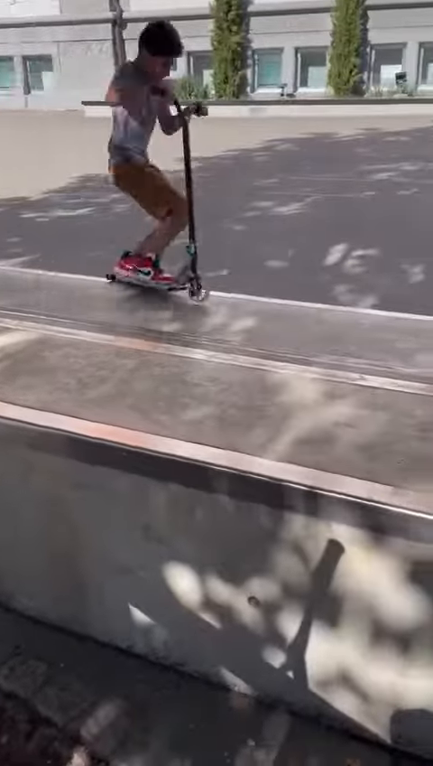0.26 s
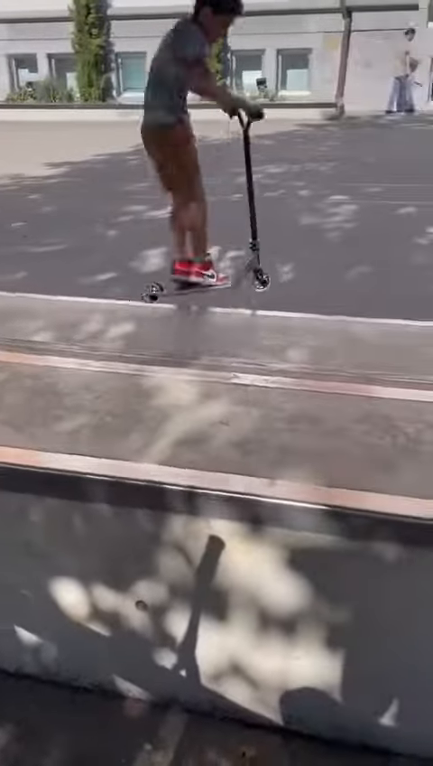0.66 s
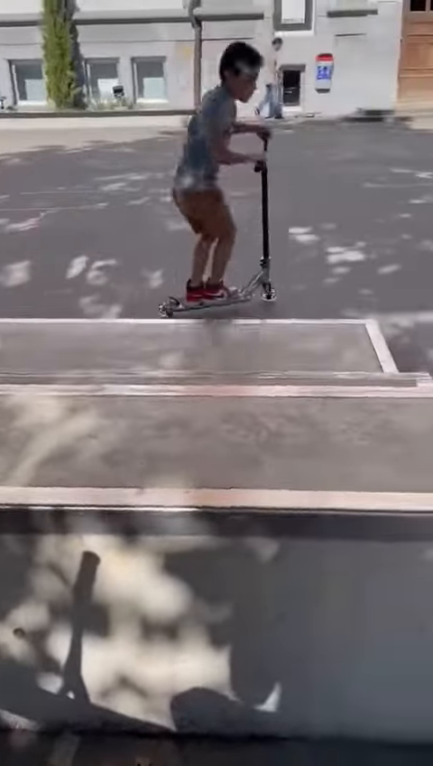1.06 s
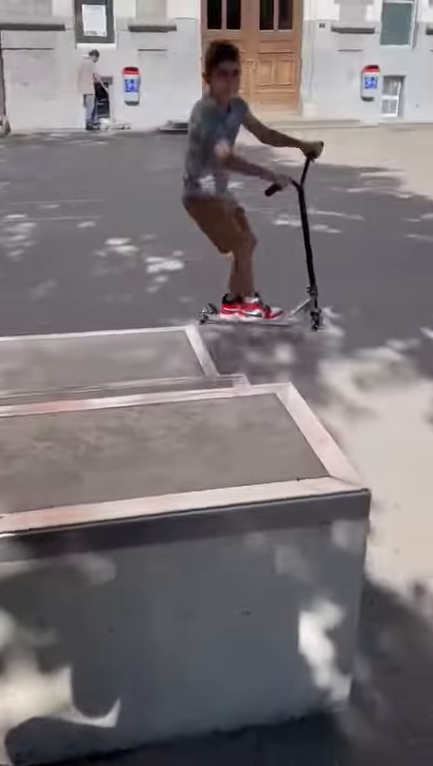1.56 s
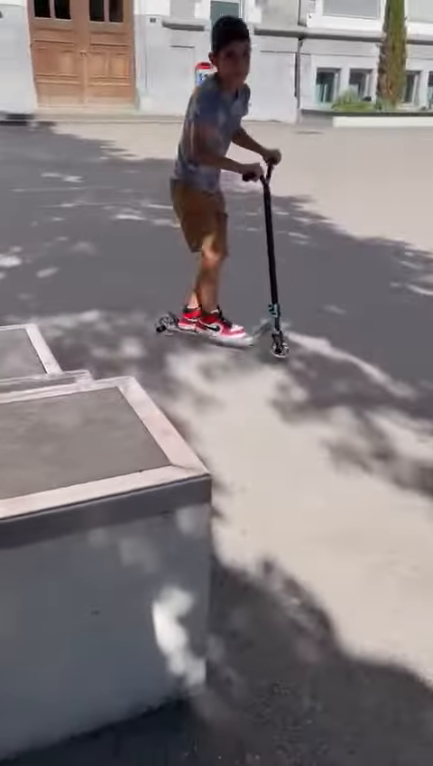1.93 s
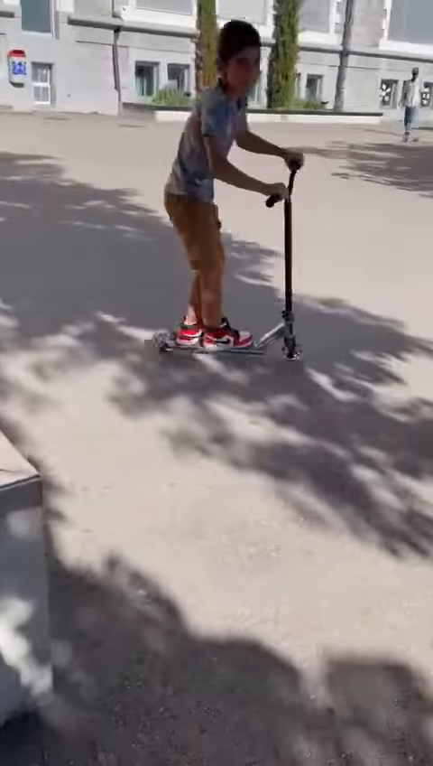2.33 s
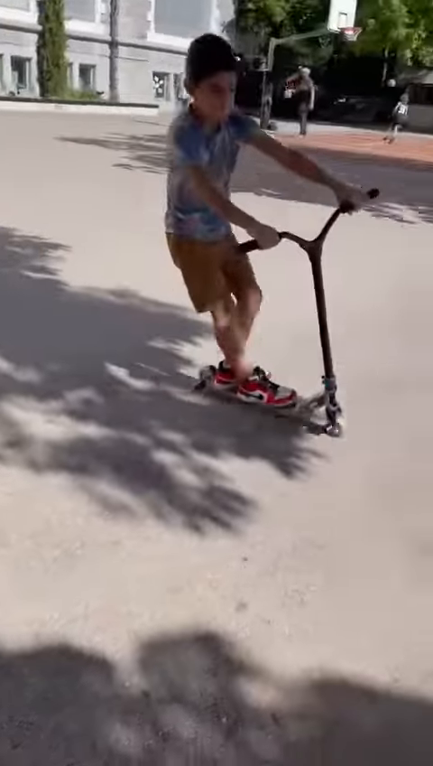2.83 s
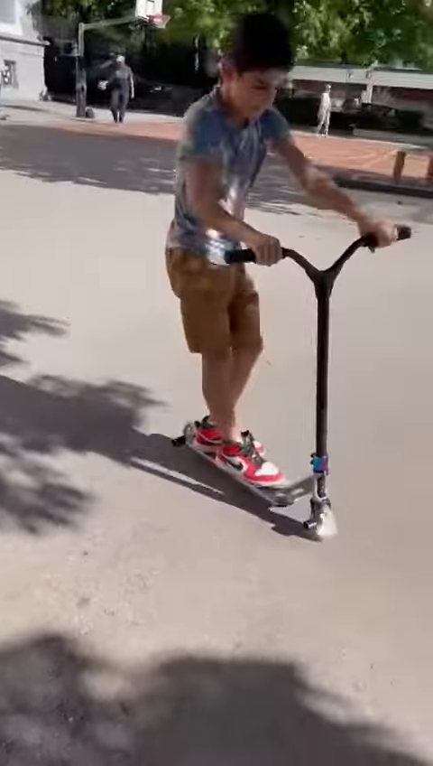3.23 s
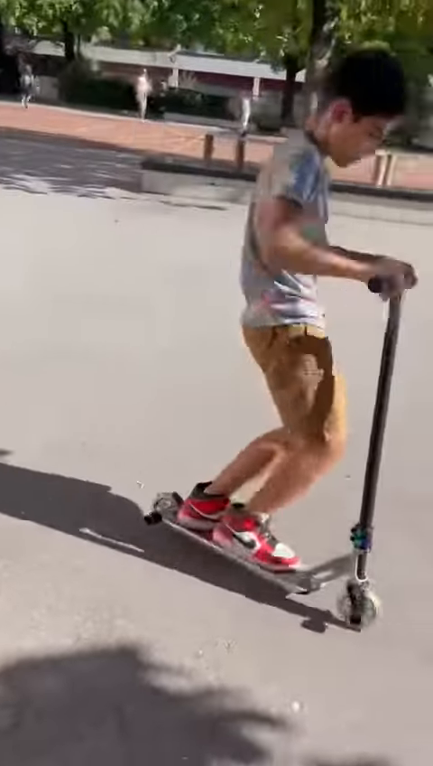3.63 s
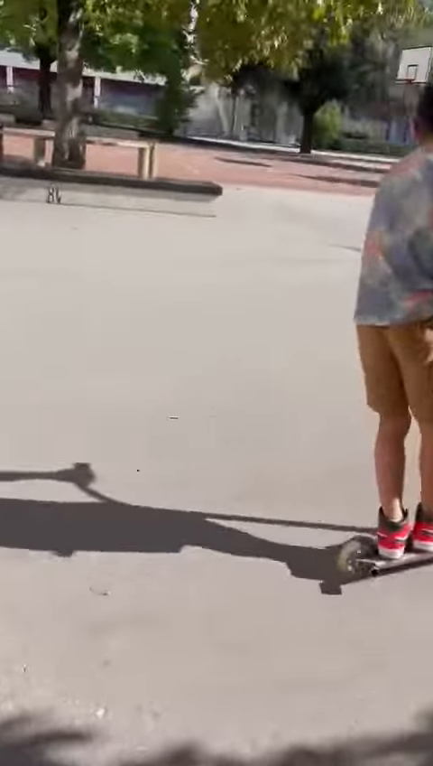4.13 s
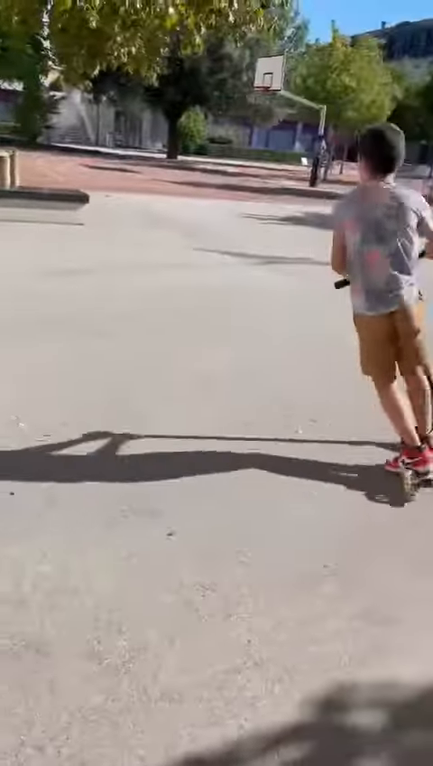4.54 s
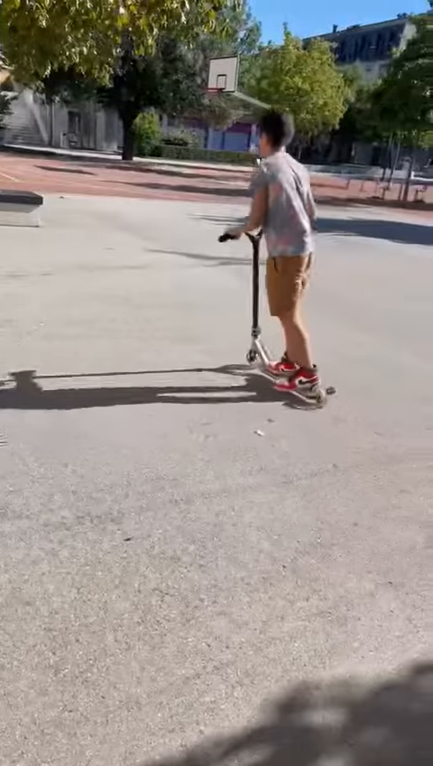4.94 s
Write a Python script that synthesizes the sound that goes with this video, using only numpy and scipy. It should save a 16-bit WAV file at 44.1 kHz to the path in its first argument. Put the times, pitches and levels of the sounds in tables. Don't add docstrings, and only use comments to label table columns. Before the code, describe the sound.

A ball thump and bright scooter clack start together, quickly followed by steel scraping, a high rubber squeak and deck knocks. Wheels drone and crunch softly across the ground between impacts, building to a hard clattering landing, then lighter scuffs and ticks. Farther off, hollow ball thumps repeat with short wall echoes. Soft town rumble fills the open yard; the moving phone microphone makes the sides shift.

```python
import sys
import numpy as np
from scipy import signal
from scipy.fft import rfft, irfft, next_fast_len
from scipy.io import wavfile
from scipy.ndimage import uniform_filter1d, map_coordinates

SR = 44100
rng = np.random.default_rng(int(sys.argv[2]) if len(sys.argv) > 2 else 0)


def transcribe(signal):
    frames = np.atleast_2d(signal).T
    limited = np.clip(frames, -1, 1)
    pcm = np.round(limited * 32767).astype(np.int16)
    wavfile.write(sys.argv[1], SR, pcm)


def volts_from_db(level):
    exponent = np.asarray(level, float) / 20
    return 10 ** exponent


N = 229128


def unit(x):
    return x / np.sqrt(np.mean(x ** 2) + 1e-20)


def along(points, hz):
    f, v = np.transpose(points)
    return np.interp(np.log(hz + 1), np.log(f + 1), v)


def curves(rows):
    s, *cols = np.transpose(rows)
    return [np.interp(np.arange(N) / SR, s, c) for c in cols]


def wobble(rate):
    knots = rng.standard_normal(int(N * rate / SR) + 4)
    return map_coordinates(knots, [np.arange(N) * rate / SR])


def filtered(x, response):
    m = next_fast_len(x.shape[-1] + 4096)
    return irfft(rfft(x, m) * response(np.fft.rfftfreq(m, 1 / SR)), m)[..., :x.shape[-1]]


def shaped(x, spectrum):
    return filtered(x, lambda hz: volts_from_db(along(spectrum, hz)))


def resonant(modes):
    def response(f):
        total = 0
        for k, (c, w, db) in enumerate(modes):
            total = total + (-1) ** k * volts_from_db(db) * 1j * f * w / (c * c - f * f + 1j * f * w)
        return total
    return response


def gritty(length, grain_db):
    grains = np.minimum(rng.exponential(size=length // 40 + 1), 3)
    size = volts_from_db(grain_db * grains).repeat(40)[:length]
    return unit(size * rng.standard_normal((2, length)))


def patchy(x, depth_db):
    z = signal.stft(x, nperseg=2048)[2]
    field = uniform_filter1d(rng.standard_normal(z.shape[1:]), size=3, axis=0)
    field = uniform_filter1d(field, size=4, axis=1)
    return unit(signal.istft(z * volts_from_db(depth_db * unit(field)), nperseg=2048)[1][:, :N])


def add(track, s, x):
    x = x[..., max(0, -round(s * SR)):]
    at = int(np.clip(round(s * SR), 0, N))
    track[..., at:at + x.shape[-1]] += x[..., :track.shape[-1] - at]


# time in seconds, rumble level in dB.
TOWN_SWELLS = [(0.0, -52.5), (0.72, -40), (1.11, -50.5), (2.07, -43), (2.25, -48.5), (3.7, -45.5),
               (4.05, -40), (4.55, -47), (5.19, -42)]
# time in seconds, rolling level in dB.
ROLLING = [(0.0, -48), (0.42, -43.5), (0.55, -51), (1.07, -55), (1.42, -53.5), (1.78, -52), (1.91, -46),
           (2.23, -52.5), (2.56, -52.5), (2.72, -46), (2.99, -51), (3.32, -53), (3.64, -53.5), (3.79, -43),
           (3.84, -45), (4.15, -48.5), (5.03, -48.5), (5.19, -46)]
# frequency in Hz, density in dB per Hz.
RUMBLE_COLOUR = [(20, -61), (40, -3.5), (60, 2), (150, 1), (230, -5.5), (350, -20), (600, -73)]
# frequency in Hz, density in dB per Hz.
WHEEL_COLOUR = [(150, -12), (300, 5), (500, 0), (720, -1), (900, -9), (1500, -40)]
# frequency in Hz, density in dB per Hz.
GRIT_COLOUR = [(500, 1), (900, 3.5), (1500, -1), (2300, 0.5), (3500, -3), (4800, -7.5), (7000, -16.5)]
# frequency in Hz, density in dB per Hz.
HISS_COLOUR = [(2500, -5.5), (4500, 0.5), (6000, -0.5), (7300, -1.5), (9000, -1), (10800, -2), (12500, -7)]


def yard():
    roll_db, = curves(ROLLING)
    mean_db = roll_db.mean()
    swing_db = roll_db - mean_db
    bumps = np.tanh(wobble(27))

    def layer(colour, grain_db):
        return unit(shaped(gritty(N, grain_db), colour))

    rumble_db = curves(TOWN_SWELLS)[0] + 1.0 + 2.6 * wobble(21.99)
    rumble = volts_from_db(rumble_db) * layer(RUMBLE_COLOUR, grain_db=0.1)
    drone_db = 2 + 1.26 * swing_db + 2.3 * bumps + 1.67 * wobble(30)
    drone = volts_from_db(drone_db) * patchy(layer(WHEEL_COLOUR, grain_db=1.0), depth_db=3.0)
    grit_db = 1 + swing_db + 2.0 * bumps
    grit = volts_from_db(grit_db) * patchy(layer(GRIT_COLOUR, grain_db=0.5), depth_db=3.0)
    hiss_db = -3 + 0.91 * swing_db + 1.4 * bumps
    hiss = volts_from_db(hiss_db) * layer(HISS_COLOUR, grain_db=2.5)

    duck_db, duck_out_s, rumble_share = -18, 0.3, 0.24
    t = np.arange(N) / SR
    duck = volts_from_db(duck_db / (1 + (t / duck_out_s) ** 8))
    rolling = duck * drone + np.sqrt(duck) * grit + hiss
    return duck ** rumble_share * rumble + volts_from_db(mean_db) * rolling


# start in seconds, peak in dB, strongest
# frequency in Hz, delay of the first house front in seconds, its loss in dB.
BOUNCES = [(-.012, -25, 115, .031, 5), (.3165, -25, 170, .03, 9), (.752, -26, 130, .014, 2),
           (1.842, -27, 150, .025, 6), (.4812, -15, 148, .0264, 5.5), (.6216, -23, 122, .073, 7.5),
           (1.8922, -19.6, 141, .0288, 3.5), (2.524, -17, 122, .0317, 6), (2.6575, -30, 120, .03, 12),
           (3.0859, -16, 157, .0321, 6.5), (3.2258, -34, 119, .03, 12), (3.811, -20.5, 115, .0332, 5),
           (3.9113, -32, 107, .09, 7), (4.0737, -15.5, 169, .0433, 11), (4.6877, -20, 163, .021, 8),
           (4.7182, -23, 140, .0135, 8), (4.775, -31, 167, .03, 12), (5.0886, -18.5, 138, .0487, 20)]


def ball():
    out, t = np.zeros((2, N)), np.arange(SR // 20) / SR
    cycles, lag_s = 2.37, .0046
    hz = cycles / (t + lag_s)
    wave = -np.cos(2 * np.pi * cycles * np.log(1 + t / lag_s))
    spread, echo_spread, echo_pitch = .52, .43, .93
    second_front, second_loss_db = 1.85, 8

    def thump(s, db, strongest_hz, octaves):
        skirt = octaves * np.where(hz > strongest_hz, 1.1, .95)
        add(out[0], s, volts_from_db(db) * wave * np.exp(-.5 * (np.log2(hz / strongest_hz) / skirt) ** 2))

    for s, db, strongest_hz, late, loss_db in BOUNCES:
        echo_hz, echo_db = echo_pitch * strongest_hz, db - loss_db
        thump(s, db, strongest_hz, spread)
        thump(s + late, echo_db, echo_hz, echo_spread)
        thump(s + second_front * late, echo_db - second_loss_db, echo_hz, echo_spread)
    return out


# start in seconds, level in dB,
# brightness in octaves above 500 Hz, t60 in seconds.
RING_HITS = [
    (.001, -21, 1.44, 0.068),
    (.481, -27.5, 1.9, 0.044),
    (3.622, -21.5, 1.18, 0.18),
    (3.676, -27.5, .4, 0.05),
    (3.949, -34.5, 1.4, .18),
    (4.122, -33, 0.17, 0.076),
]
# start in seconds, level in dB, brightness in octaves above 500 Hz,
# t60 in seconds.
TICK_HITS = [(.015, -12, 2.29, .028), (.086, -38, 1.6, 0.065), (.104, -39, 2.8, 0.065), (.314, -41, 3, .16),
             (.761, -28, 2.13, 0.047), (1.862, -38, 1.12, 0.04), (2.118, -49, 1.66, 0.21),
             (2.67, -33, 1.17, 0.024), (2.712, -35.5, 1.9, .03), (4.946, -34.5, 1.47, 0.083),
             (5.1, -43.5, 1.73, 0.09)]
# start in seconds, level in
# dB, brightness in octaves above 500 Hz, t60 in seconds.
THUD_HITS = [(.324, -39, 0.68, 0.084), (.512, -42.5, 1.9, 0.22), (.742, -38.5, 1.9, 0.069),
             (.755, -32.5, 0.93, .076), (1.694, -37.5, 0.39, 0.15), (1.707, -54, 0.42, 0.11),
             (1.845, -36.5, 1.3, 0.1), (1.892, -44, 0.54, 0.11), (1.931, -35.5, 0.35, 0.047),
             (2.521, -44, 1.42, 0.17), (3.086, -46, 1.33, 0.2), (3.658, -38.5, 2.8, 0.16),
             (3.685, -34.5, 0.96, 0.077), (4.692, -41.5, 1.45, 0.11), (4.73, -47, 1.3, 0.13),
             (4.77, -52.5, 1.73, 0.14), (5.087, -42, 0.9, 0.09)]
# start in seconds, level in dB, brightness in octaves above
# 500 Hz, t60 in seconds.
SLAM_HITS = [
    (.498, -38.5, 2.4, 0.09),
    (.751, -21.5, 1.96, 0.06),
    (.833, -46.5, 1.55, 0.34),
    (1.689, -33.5, 1.58, 0.17),
    (3.611, -21.5, 1.23, 0.071),
    (3.634, -19.5, 1.28, 0.059),
    (3.645, -24.5, 1.03, 0.14),
    (3.844, -38, 1.16, 0.27),
    (4.376, -40, 0.65, 0.072),
    (4.685, -38.5, 1.75, 0.042),
]
# frequency in Hz, width in Hz, level in dB.
DECK_MODES = [(701, 45, -1), (944, 79, -3.5), (1133, 91.2, 4.5), (1368, 180, -2.5), (1767, 144, -3),
              (1972, 55, -1.5), (2288, 203, 0.5), (2760, 130, -2.5), (2990, 190, -0.5), (3530, 250, -1.5)]
# frequency in Hz, width in Hz, level in dB.
HOLLOW_MODES = [(255.5, 44.3, 3.5), (355, 197.7, -0.5), (444.4, 134, -3.5), (638, 66, -6)]


def clacks():
    out, t = np.zeros((2, N)), np.arange(SR // 4) / SR

    def clack(s, db, bright, t60, knock_db, crack_db):
        t60 = np.clip(t60, .015, .5)

        def rattle(fast):
            fall = volts_from_db(-60 * t * fast / t60) + 1.54 * volts_from_db(-60 * t / 0.0016)
            return gritty(len(t), grain_db=1.5) * fall * (1 - np.exp(-t / 0.0000533))

        struck = []
        for hz, width, level in DECK_MODES:
            off = np.log2(hz / 500) - bright
            struck.append((hz, width, level + 1.2 * rng.normal() - 11 * off ** 2))
        plate = filtered(rattle(1), resonant(struck))
        knock = filtered(rattle(0.99), resonant(HOLLOW_MODES))
        crack = shaped(rattle(0.63), HISS_COLOUR)
        for part, rel_db in ((plate, 2.5), (knock, knock_db + 5.0), (crack, crack_db + 6.5)):
            even = np.sqrt(t60 * SR / 14) / np.linalg.norm(part[0])
            add(out, s - .0005, volts_from_db(db + rel_db) * part * even)

    kinds = ((RING_HITS, -12.5, -20.5), (TICK_HITS, -21, -3.5), (THUD_HITS, 6, -13.5), (SLAM_HITS, -6.5, -13))
    for hits, knock_db, crack_db in kinds:
        for s, db, bright, t60 in hits:
            clack(s, db, bright, t60, knock_db, crack_db)
    return out


# time in seconds, pitch in Hz, level in dB.
SLIDE = [
    (.04, 2140, -52),
    (.1, 2040, -46),
    (.17, 2156, -47.5),
    (.26, 2450, -45),
    (.32, 2694, -53),
]
# multiple of the pitch, level in dB.
SLIDE_BANDS = [(1.0, 0), (1.45, -9), (2.9, -16)]


def grind():
    hz, db = curves(SLIDE)
    t, turn = np.arange(N) / SR, 2 * np.pi * np.cumsum(hz) / SR

    def band(k):
        return wobble(450 * k) * np.sin(k * turn) + wobble(450 * k) * np.cos(k * turn)

    def side():
        return sum(volts_from_db(band_db) * band(k) for k, band_db in SLIDE_BANDS)

    return volts_from_db(db) * (t < SLIDE[-1][0]) * np.array([side(), side()])


# start in seconds, length in seconds, level in dB, colour in Hz,
# fizz in dB over the body.
SCUFF_STROKES = [(.33, 0.076, -40, 910, -31), (0.461, 0.02, -34, 2059, -8.5), (0.487, .05, -34, 890, -14),
                 (0.743, 0.03, -31, 366, -23), (1.972, 0.073, -38.5, 1160, 3.5),
                 (2.037, 0.048, -45, 1500, 2.5), (2.108, 0.052, -45.5, 2180, -5.5),
                 (2.701, 0.18, -43, 1160, -4), (3.607, 0.14, -28, 593, -32),
                 (3.629, 0.19, -36.5, 1155, -11.5), (4.114, 0.041, -34.5, 593, -30.5),
                 (0.104, 0.11, -46.5, 2180, -2), (.18, 0.21, -46, 2466, -1.5),
                 (4.696, 0.065, -46.5, 1520, -6.5), (3.831, .07, -37.5, 1218, -25),
                 (4.049, 0.063, -41.5, 1290, -1.5), (4.956, 0.096, -43.5, 1370, -6)]


def scuffs():
    out = np.zeros((2, N))
    for s, length, db, hz, fizz_db in SCUFF_STROKES:
        count = int(length * SR)
        stroke = np.sin(np.pi * (np.arange(count) / count) ** 0.59)
        colour = resonant([(hz, .8 * hz, 0)])
        body = unit(filtered(gritty(count, grain_db=-0.5), lambda f: colour(f) ** 2))
        fizz = unit(shaped(gritty(count, grain_db=2.5), HISS_COLOUR))
        add(out, s, volts_from_db(db) * stroke * (body + volts_from_db(fizz_db) * fizz))
    return out


# time in seconds, pitch in Hz, level in dB.
SHOE_SQUEAK = [
    (.319, 3520, -50),
    (.324, 3400, -19),
    (.329, 3310, -20),
    (.343, 3430, -20),
    (.3495, 3450, -36),
    (.353, 3450, -31),
    (.356, 3400, -42),
    (.36, 3400, -33),
    (.39, 3400, -52),
]


def squeak():
    hz, db = curves(SHOE_SQUEAK)
    t = np.arange(N) / SR
    turn = 2 * np.pi * np.cumsum(hz * (1 + .007 * wobble(350))) / SR
    tone = np.sin(turn) + volts_from_db(-10 + 2.5 * wobble(250)) * np.sin(2 * turn)
    rough = 1 + .16 * wobble(500)
    sounding = (t > SHOE_SQUEAK[0][0]) * (t < SHOE_SQUEAK[-1][0])
    return volts_from_db(db) * rough * tone * sounding * np.array([[1], [.6]])


# frequency in Hz, t60 in seconds.
WALL_DECAY = [(100, 0.45), (1000, 0.95), (4000, 0.31), (10000, 0.41)]


def walls(x):
    hz, t, z = signal.stft(rng.standard_normal((2, SR // 2)), SR, nperseg=256)
    fall = volts_from_db(-60 * t / along(WALL_DECAY, hz)[:, None])
    tail = signal.istft(z * fall, SR, nperseg=256)[1]
    tail = tail / np.linalg.norm(tail[0])
    late = np.pad(x, (700, 0))[None]
    return signal.fftconvolve(late, tail, axes=1)[:, :N]


# time in seconds, left over right in dB near 1 kHz.
SIDE_LEAN = [(0.0, -8), (0.23, 3), (0.3, -8.5), (1.3, 1.5), (2.2, -6.5), (2.23, 1), (2.6, -6), (2.69, 8.5),
             (2.93, -3), (3.44, 0.5), (3.57, -3), (3.6, 10.5), (3.79, 2.0), (5.19, 1.5)]
# frequency in Hz, half turns by which left leads.
PORT_LEAD = [(0, 0), (4000, .1), (4800, 1), (5000, 1.1), (5600, 1.95), (6800, 2.05), (7900, 2.95),
             (9800, 3.05), (11200, 4)]
# frequency in Hz, angle in radians of the part that differs.
PORT_WIDTH = [(60, 0.0093), (150, 0.015), (350, 0.214), (700, 0.65), (1200, 0.69), (1800, 0.35),
              (2600, 0.67), (3600, 0.64), (4300, 0.72), (11000, 0.72)]


def ports(pair):
    def lead(hz):
        return np.pi / 2 * np.interp(hz, *np.transpose(PORT_LEAD))

    def share(hz):
        lock = np.where(hz > 4400, 0.33 + 0.6 * abs(np.sin(2 * lead(hz))), 1)
        angle = along(PORT_WIDTH, hz) * lock
        return np.array([np.cos(angle), np.sin(angle)])

    left_right = np.array([[1], [-1]])
    common, loose = filtered(pair, share)
    both = np.array([common + loose, common - loose])
    lean = np.tanh(curves(SIDE_LEAN)[0] * np.log(10) / 40) * left_right
    both = both + lean * filtered(both, lambda hz: np.exp(-np.log2((hz + 1) / 1080) ** 2 / 0.55))
    return filtered(both, lambda hz: np.exp(1j * lead(hz) * left_right))


def scene():
    bounce, scooter, shoe = ball(), clacks() + scuffs(), squeak()
    wet = volts_from_db(-15.0) * walls(scooter[0] + volts_from_db(-5) * shoe[0]) + volts_from_db(-14.5) * walls(bounce[0])
    return ports(scooter + shoe + bounce + wet + yard() + grind())


def thin_treble(x, weaker_db, masked_db, faint_db):
    frames = dict(window="cosine", nperseg=2048, noverlap=1024)
    hz, _, z = signal.stft(np.array([x[0] + x[1], x[0] - x[1]]) / 2, SR, **frames)
    hz, lines = hz[:1024, None], abs(z[:, :1024]) ** 2

    def banded(size):
        return np.repeat(lines.reshape(2, 1024 // size, size, -1).mean(2), size, axis=1)

    power = banded(size=16)
    treble = power[:, 200:500].mean((0, 1))
    attack = treble > 3 * np.roll(treble, 1)
    weak = (power < volts_from_db(2 * weaker_db) * power[::-1]) & (hz > 1500) & ~attack
    masked = (power < volts_from_db(2 * masked_db) * treble) & (hz > 4000)
    floor_db = faint_db - 5 * (hz < 9600)
    floor = volts_from_db(2 * floor_db) * np.sqrt(treble * np.median(treble))
    faint = (banded(size=4) < floor) & (hz > 3500) & ~attack
    z[:, :1024][weak | masked | faint] = 0
    mid, side = signal.istft(z, SR, **frames)[1][:, :N]
    return np.array([mid + side, mid - side])


def band_limit(x):
    return signal.sosfilt(signal.butter(12, 12490, fs=SR, output="sos"), x)


# frequency in Hz, gain in dB.
BAND_EDGE = [(10900, 0), (11300, -6), (12100, -10), (12600, -77)]


def record(dry):
    edged = shaped(dry, BAND_EDGE)
    mix = thin_treble(edged, weaker_db=-6.5, masked_db=-10, faint_db=-3.5)
    return band_limit(mix)


dry = scene()
out = record(dry)
transcribe(out)
```